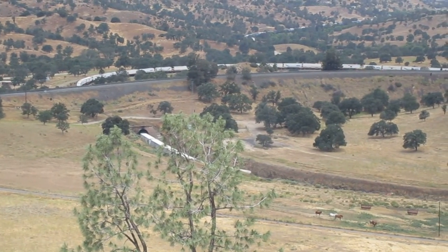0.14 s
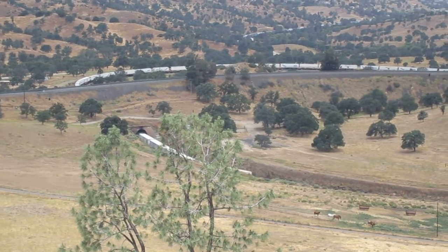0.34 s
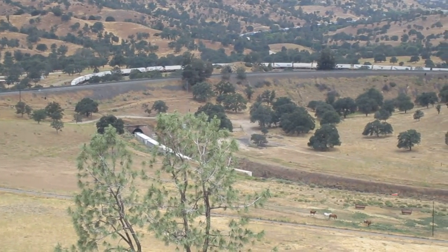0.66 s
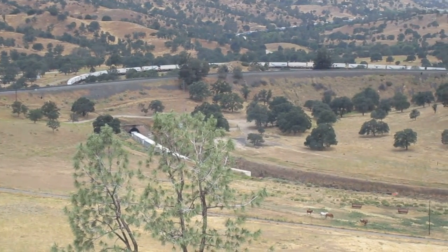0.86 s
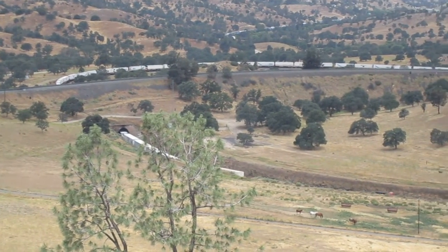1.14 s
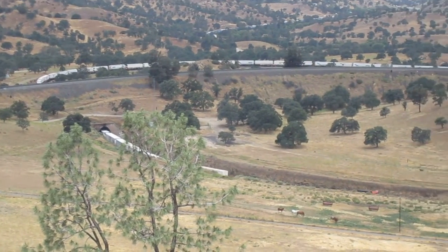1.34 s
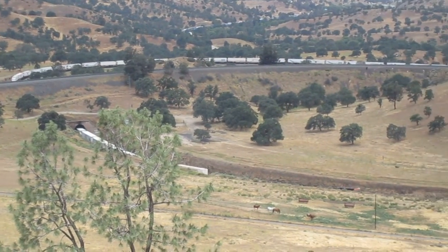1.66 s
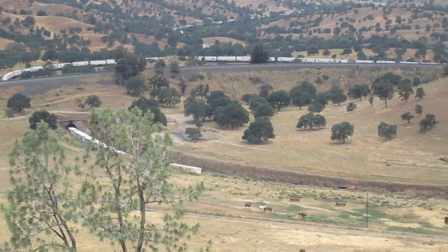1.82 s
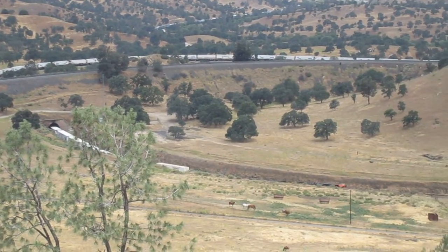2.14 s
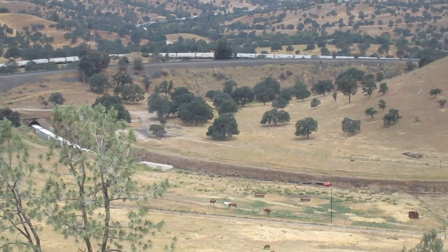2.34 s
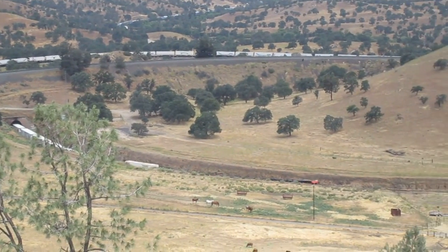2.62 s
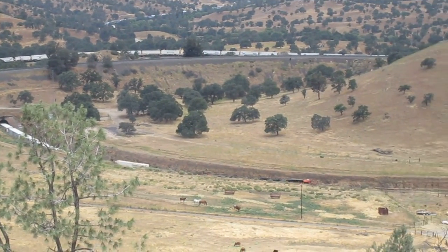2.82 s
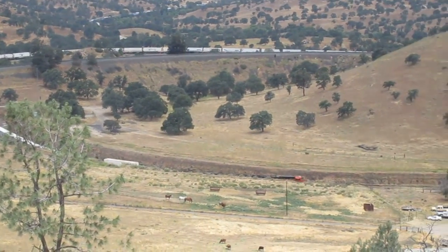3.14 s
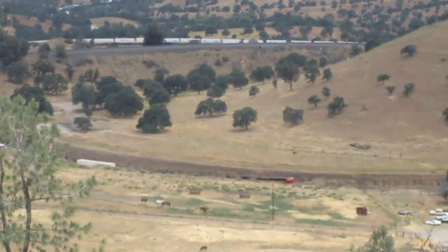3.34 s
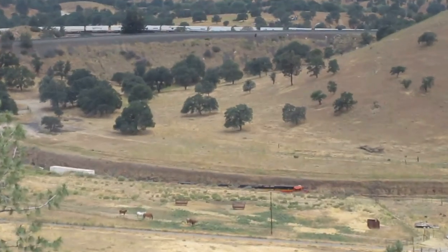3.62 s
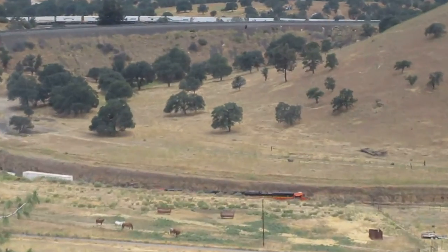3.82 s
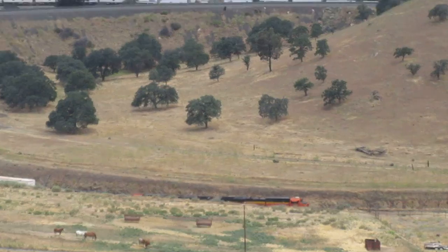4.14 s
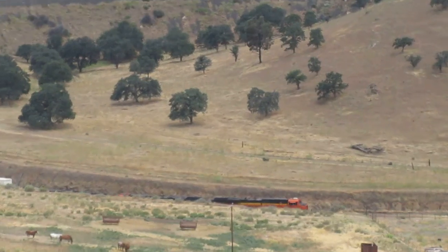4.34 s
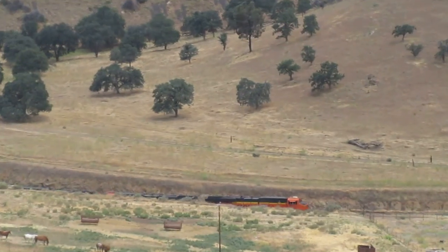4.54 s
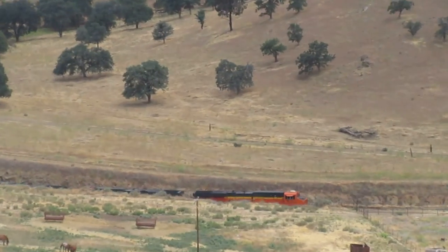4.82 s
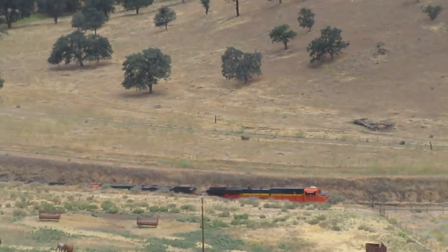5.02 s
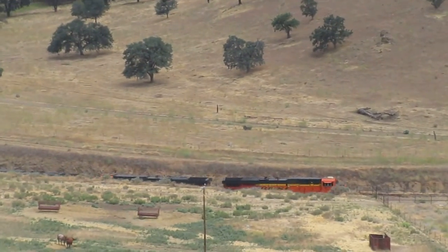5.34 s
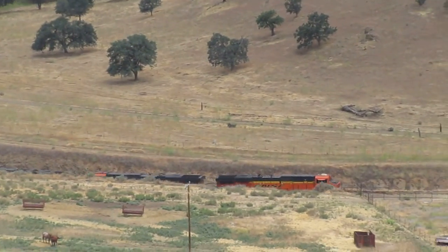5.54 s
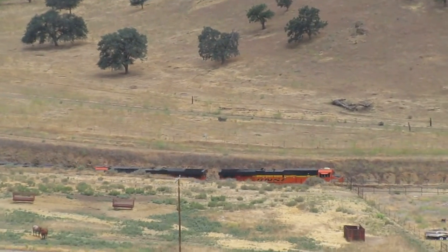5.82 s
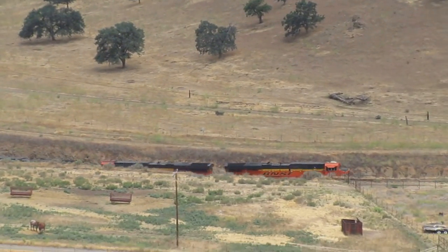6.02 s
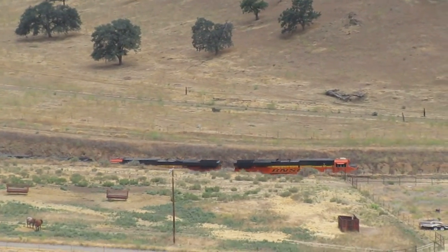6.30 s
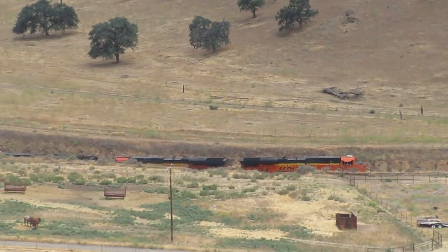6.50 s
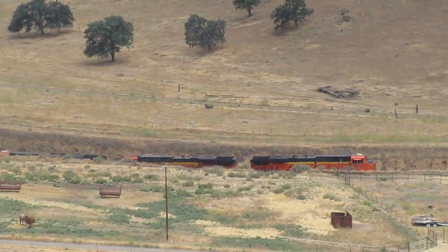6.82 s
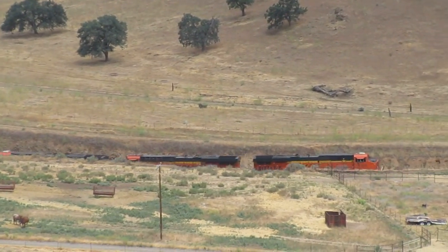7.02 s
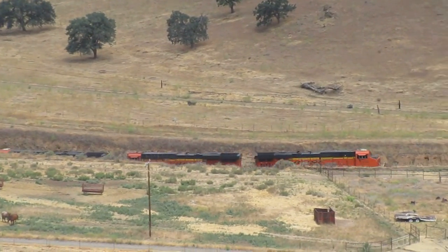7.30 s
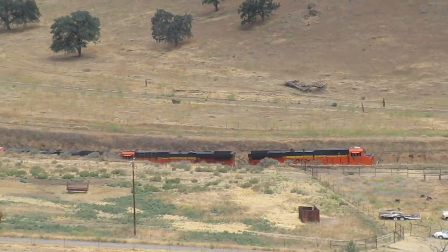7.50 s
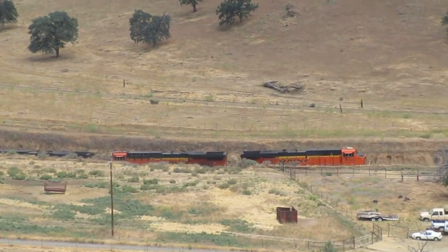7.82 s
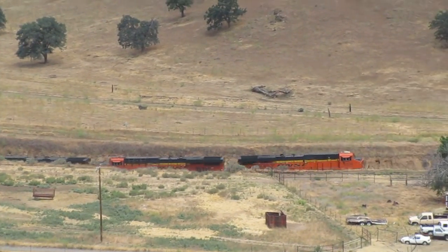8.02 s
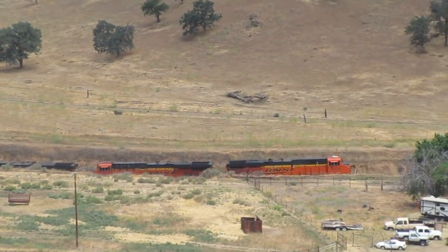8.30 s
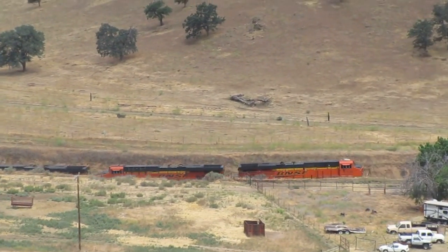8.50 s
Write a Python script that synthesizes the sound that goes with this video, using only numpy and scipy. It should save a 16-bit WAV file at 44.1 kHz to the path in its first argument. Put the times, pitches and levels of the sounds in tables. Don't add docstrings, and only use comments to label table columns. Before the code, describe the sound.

Outdoors on a dry hillside, a small camera's unprotected microphone is battered by gusts: low thuds, flutters and occasional clipped bursts. Behind them, distant diesel locomotives drone steadily with faint whines and a soft rolling roar of wheels. Around three seconds the lens drive clicks and whirrs faintly for about two seconds. The heaviest wind blows come near five and six seconds, then it calms and the train is clearer.

```python
import sys
import numpy as np
from scipy import signal
from scipy.fft import rfft, irfft
from scipy.io import wavfile
from scipy.ndimage import uniform_filter1d, minimum_filter1d

SR = 44100
rng = np.random.default_rng(int(sys.argv[2]) if len(sys.argv) > 2 else 0)


def gain_from_decibels(decibels):
    exponent = np.asarray(decibels, float) / 20
    return 10 ** exponent


def to_wav(s):
    ch = np.atleast_2d(s).T
    pcm = np.round(np.clip(ch, -1, 1) * 32767)
    wavfile.write(sys.argv[1], SR, pcm.astype(np.int16))


N = 381899
TIME = np.arange(N) / SR
CYCLE_HZ = 8.84
SCAN_HZ = 15734
# time_s, level_db, treble_db
ROAR = [(0, -38, -5), (.5, -41, -3.5), (.8, -43, -3.5), (1.35, -42, -6), (1.7, -39.5, -7),
        (2.27, -39, -7.5), (2.45, -36.5, -3), (2.65, -36, -2), (2.86, -35, -6), (3.15, -38, -3),
        (3.52, -41, -1.5), (3.88, -40, -7), (4.6, -42, -5.5), (5.05, -42, -5), (5.37, -36, -3),
        (5.7, -39, -6), (6.1, -40, -6.5), (8.66, -39.5, -5.5)]


def unit(x):
    return x / np.sqrt(np.mean(x ** 2))


def columns(table):
    time_s, *rest = np.transpose(table)
    return [np.interp(TIME, time_s, column) for column in rest]


def swells(rows, base_db):
    coarse = TIME[::64]
    size = gain_from_decibels(base_db)
    for peak_s, length_s, peak_db in rows:
        phase = np.clip((coarse - peak_s) / length_s, -.5, .5)
        size = size + gain_from_decibels(peak_db) * np.cos(np.pi * phase) ** 2
    return np.interp(TIME, coarse, 20 * np.log10(size))


def walk(rate_hz):
    hold = int(SR / rate_hz)
    levels = np.repeat(rng.standard_normal(N // hold + 1), hold)
    return 1.292 * uniform_filter1d(uniform_filter1d(levels, hold), hold)[:N]


def band(x, lo_hz, hi_hz, order=2):
    return signal.sosfilt(signal.butter(order, [lo_hz, hi_hz], "band", fs=SR, output="sos"), x)


def coloured(colour, lo_hz, hi_hz):
    hz = np.maximum(np.arange(N // 2 + 1) * SR / N, 1)
    point_hz, point_db = np.transpose(colour)
    shape = gain_from_decibels(np.interp(np.log(hz), np.log(point_hz), point_db))
    inside = (hz > lo_hz) & (hz < hi_hz)
    shape = shape / np.sqrt(2 * np.sum(shape[inside] ** 2) / N)
    return irfft(rfft(rng.standard_normal(N)) * shape, N)


def tones(hz, orders, flutter_db, flutter_hz):
    turn = 2 * np.pi * np.cumsum(hz) / SR
    out = 0
    for multiple, db in orders:
        level = np.sqrt(2) * gain_from_decibels(db + flutter_db * walk(flutter_hz))
        out = out + level * np.sin(multiple * turn + 7 * rng.random())
    return out


def exhaust():
    # peak_s, length_s, peak_db
    order_swells = [
        [(1.75, 1.3, -23), (2.8, 1.1, -26), (3.9, 1.3, -26), (8.5, 1.7, -22)],
        [(.3, 1.9, -18), (1.25, 1.5, -21), (3.5, 1.1, -25), (4.3, 1.1, -29), (5.6, 1.3, -24)],
        [(.95, .8, -23), (2.3, 1.2, -28), (2.9, .8, -25), (3.8, 1.2, -29), (6.4, 1.6, -27), (8.55, 1.1, -23)],
        [(.5, .7, -25), (1.6, 1.3, -23), (3.0, .7, -20), (4.15, 1.6, -23), (6.7, 1.7, -24), (8.5, 1.2, -26)],
    ]
    # multiple of the cycle, level_db
    weak_orders = [(10, -36), (11, -35), (14, -40), (18, -43.5), (19, -38), (21, -39.5)]
    cycle = np.full(N, CYCLE_HZ)
    levels_db = map(swells, order_swells, (-36, -34, -36, -34))
    strong = tones(cycle, zip((6, 9, 12, 15), levels_db), flutter_db=2.0, flutter_hz=4.3)
    weak = tones(cycle, weak_orders, flutter_db=3.5, flutter_hz=3.4)
    return strong + gain_from_decibels(columns(ROAR)[0] + 41) * weak


def whine(level_db, hz, wander, orders):
    speed = hz * (1 + wander * walk(6))
    return gain_from_decibels(level_db) * tones(speed, orders, flutter_db=3.0, flutter_hz=7)


def gear_whine():
    # peak_s, length_s, peak_db
    gear_swells = [(1.95, .9, -43), (2.8, 1.3, -37), (4.05, 1.7, -39), (5.4, 1.5, -41), (7.25, 1.1, -40),
                   (8.2, 1.2, -44)]
    # multiple, level_db
    gear_orders = [(1, -10), (2, 1.5), (3, -11), (4, -8.5), (5, -14.5), (6, -19), (8, -16)]
    return whine(swells(gear_swells, -50), 375.3, .0015, gear_orders)


def fan_whine():
    # peak_s, length_s, peak_db
    fan_swells = [(.4, 1.3, -44), (1.9, 1.1, -44), (4.4, 1.3, -43), (7.7, 1.1, -44), (8.6, 1.5, -38)]
    # multiple, level_db
    fan_orders = [(2, -5), (3, 2), (4, 2), (5, -7), (6, -6), (7, -6), (8, -11), (10, -10.5), (11, -19)]
    return whine(swells(fan_swells, -50), 210.6, .003, fan_orders)


def motor_whine():
    # peak_s, length_s, peak_db
    motor_swells = [(1.5, 1.2, -57), (5.2, 1.5, -56), (7.5, 1.7, -43), (8.5, 1.2, -48)]
    # multiple, level_db
    motor_orders = [(1, -0.5), (2, 4.5), (3, 1), (4, -0.5), (5, -7.5), (6, -10.5)]
    return whine(swells(motor_swells, -61), 418.5, .0005, motor_orders)


def turbocharger():
    # peak_s, length_s, peak_db
    turbo_swells = [(.15, .3, -12), (.62, .25, -6), (.95, .7, -8), (3.3, 1.1, -12), (4.6, .9, -14),
                    (6.9, 2.3, -10), (8.3, 1.5, -12)]
    centre_hz, width_hz = 3848, 260
    rush = band(rng.standard_normal(N), centre_hz - width_hz / 2, centre_hz + width_hz / 2)
    return gain_from_decibels(swells(turbo_swells, -17) + 2.5 + 2 * walk(15)) * unit(rush)


def gear_housing(treble_db):
    ring = unit(band(rng.standard_normal(N), 2930, 3060))
    return gain_from_decibels(1.5 * treble_db - 9 + 2 * walk(12)) * ring


def roar():
    # pitch_hz, level_db (per Hz)
    roar_colour = [(50, -55), (110, -52.5), (240, -62), (500, -73.5), (850, -67.5), (960, -68),
                   (1100, -78.5), (1400, -73.5), (1800, -80.5), (2800, -83.5), (4200, -92), (5400, -101),
                   (6100, -111), (7200, -126)]
    level_db, treble_db = columns(ROAR)
    bass_db = 0.6 * (-40 - level_db) + 0.3
    noise = coloured(roar_colour, 1669, 2330)
    edges_hz = 50 * 2 ** np.arange(0, 7.6, .5)
    out = 0
    for lo_hz, hi_hz in zip(edges_hz, edges_hz[1:]):
        tilt_db = bass_db if hi_hz < 1200 else (treble_db + 5) * (lo_hz > 2200)
        flutter_db = 0.73 * walk(3.7) + 1.06 * walk(20)
        out = out + gain_from_decibels(tilt_db + flutter_db) * band(noise, lo_hz, hi_hz, order=3)
    throb = 1 + 0.085 * np.sin(2 * np.pi * 3 * CYCLE_HZ * TIME)
    return gain_from_decibels(level_db - 2.0) * throb * (out + gear_housing(treble_db) + turbocharger())


def eddy(hz, turns, lean=1):
    half = int(SR * turns / hz)
    t = np.arange(-half, half) / SR
    return np.hanning(len(t)) * np.cos(2 * np.pi * hz * t + lean)


def wind():
    # time_s, level_db
    gust = [(0, -15), (.14, -22), (.62, -18), (.76, -22), (1.45, -26), (1.63, -23), (2.4, -28), (3.05, -23),
            (3.3, -30), (3.75, -32), (4.2, -24), (5.1, -26), (5.47, -18), (5.87, -21), (6.0, -28),
            (7.0, -33), (7.15, -24), (8.66, -24)]
    # peak_s, peak_db
    heaves = [(.3, -27), (.55, -29), (1.0, -29), (1.21, -22), (1.57, -20), (1.7, -21), (1.98, -20),
              (2.17, -17), (2.3, -22), (2.46, -13), (2.62, -15), (3.02, -17), (3.23, -17), (3.4, -12),
              (3.5, -13), (3.74, -26), (3.96, -13), (4.29, -20), (4.7, -22), (5.33, -20), (5.47, -16),
              (5.86, -16), (6.08, -20), (6.44, -20), (6.7, -12), (7.28, -23), (7.62, -23), (8.05, -27),
              (8.32, -24), (8.55, -27)]
    # pitch_hz, level_db
    eddies = [(35, 2.5), (60, -3.5), (100, 1.5), (170, 1.5), (280, -3.5), (450, -8.5), (720, -18.5),
              (1100, -30)]
    gust_db, = columns(gust)
    heave_length_s = .28
    heave_db = swells([(s, heave_length_s, db) for s, db in heaves], -36)
    puff = np.minimum(walk(25), 1.1)
    out = 0
    for k, (hz, db) in enumerate(eddies):
        hits = np.zeros(N)
        at = rng.integers(N, size=int(1.3 * hz * N / SR))
        hits[at] = rng.standard_normal(len(at)) * gain_from_decibels(2.0 * rng.exponential(size=len(at)))
        share = min(hz / 150, 1)
        puffed_db = gust_db + (1.0 + 0.58 * k) * puff
        gain = gain_from_decibels(db + (1 - share) * heave_db + share * puffed_db)
        out = out + gain * unit(signal.oaconvolve(hits, eddy(hz, turns=0.69), "same"))
    return out * gain_from_decibels(-3.5)


def add_swing(out, centre_s, db, swing):
    at = max(int(centre_s * SR) - len(swing) // 2, 0)
    out[at:at + len(swing)] += gain_from_decibels(db) * swing


def buffets():
    # peak_s, peak_db, pitch_hz, sharp_db
    hard_buffets = [(.04, -6, 278, -20), (.278, -12, 284, -9), (.408, -11.5, 140, -12.5),
                    (.42, -4.1, 312, -23), (.498, -8.5, 215, -13), (.65, -6.5, 215, -15),
                    (.899, -10.5, 240, -13), (1.218, -6.7, 215, -24), (1.792, -9.5, 287, -15),
                    (1.853, -5, 244, -25), (1.956, -6, 248, -13.5), (2.133, -11, 312, -10),
                    (2.142, -6, 168, -19), (2.961, -7, 140, -19), (2.993, -8.5, 192, -16),
                    (3.063, -15.5, 549, -18), (3.079, -4.5, 220, -22), (3.167, -9.9, 248, -16),
                    (3.427, -8.5, 377, -35), (4.334, -5.5, 215, -16), (4.744, -4.5, 188, -18),
                    (4.952, -6.5, 142, -10), (4.97, -5, 272, -16), (4.985, .5, 194, -13),
                    (5.544, -9.1, 316, -14), (5.563, -7, 161, -22), (5.879, -.5, 584, -20),
                    (5.892, -4, 300, -12), (7.072, -8, 146, -13), (7.39, -10, 523, -20)]
    # peak_s, peak_db, pitch_hz
    knocks = [(.06, -13.5, 510), (.305, -9, 291), (.397, -9, 260), (.673, -11, 388), (.856, -12, 141),
              (.911, -9.5, 280), (.999, -11.6, 301), (1.51, -9, 200), (1.556, -11, 140), (1.592, -10, 183),
              (1.843, -8, 288), (1.918, -7.2, 291), (1.968, -11, 265), (2.59, -10, 237), (2.681, -8.5, 161),
              (2.972, -10.6, 406), (3.027, -9, 194), (3.401, -9, 306), (3.918, -12.5, 248),
              (4.252, -10.5, 161), (4.578, -10.5, 312), (5.237, -12, 390), (5.441, -6.5, 187),
              (5.633, -11.5, 140), (5.755, -11, 196), (5.827, -10, 140), (5.844, -7.5, 254),
              (7.243, -11, 181), (7.316, -7.5, 212), (7.369, -10, 203)]
    # peak_s, peak_db, pitch_hz
    crests = [(4.984, -24, 1600), (5.875, -4, 330), (5.881, -8, 560), (5.881, -22, 1900), (5.884, -14, 800),
              (5.893, -24, 1750), (7.072, -13, 620), (3.165, -15, 650)]
    knock_sharp_db = -22
    rows = list(hard_buffets) + [(*knock, knock_sharp_db) for knock in knocks]
    out = np.zeros(N + SR)
    for s, db, hz, sharp_db in rows:
        # pitch_hz, level_db, turns, spread_s
        parts = ((hz, 0, 1.1, .001),
                 (np.sqrt(hz * 1100), sharp_db * .45, 1.5, .003),
                 (1050, sharp_db - 1.0, 1.4, .0015),
                 (hz * .5, -3, .9, .012))
        for part_hz, part_db, turns, spread_s in parts:
            swing = eddy(part_hz, turns, lean=2 * np.pi * rng.random())
            late_s = spread_s * (rng.random() - .5)
            add_swing(out, s + late_s, db + part_db + 0.5, swing)
    for s, db, hz in crests:
        add_swing(out, s, db, eddy(hz, turns=1.6))
    return out[:N]


def lens_whirr():
    # pitch_hz, level_db (per Hz)
    drive_colour = [(4500, -25), (6500, -0.5), (7500, 2.5), (9000, -2.5), (10800, -1), (13200, -8),
                    (15000, -5.5), (15800, -8)]
    # start_s, end_s, level_db
    drive_runs = [
        (3.0, 3.2, -66),
        (3.2, 3.78, -70),
        (3.78, 4.75, -66.5),
        (4.75, 5.1, -70),
    ]
    grain = gain_from_decibels(1.5 * walk(30) + 1.5 * walk(200))
    whirr = coloured(drive_colour, 6500, 15000) * grain
    running = sum(gain_from_decibels(db) * ((TIME > start) & (TIME <= end)) for start, end, db in drive_runs)
    return uniform_filter1d(running, size=1300) * whirr


def lens_ticks():
    # start_s, level_db, top_db (upper band over
    ticks = [(3.010, -60.5, -4), (3.022, -58, -12), (3.0375, -46, 1), (3.066, -60.5, -0.5),
             (3.082, -52.5, -5.5), (3.130, -61, -1), (3.180, -50, -2.5), (3.252, -64.5, 1),
             (4.744, -60, -1), (5.026, -64.5, 1), (4.9835, -54, 0), (5.8775, -60, -3)]
    out = np.zeros(N)
    t = np.arange(int(.01 * SR)) / SR
    for s, db, top_db in ticks:
        snap = rng.standard_normal(len(t)) * np.exp(-t / 0.0013)
        top = unit(band(snap, 8600, 13500, order=3))
        tick = unit(band(snap, 5400, 7300)) + gain_from_decibels(top_db) * top
        at = int(s * SR)
        out[at:at + len(t)] += gain_from_decibels(db - 5) * tick
    return out


def electronics():
    # pitch_hz, level_db (per Hz)
    hiss_colour = [(4000, -27.5), (6000, -1.5), (7500, -5), (10000, -6.5), (12500, -10.5), (15000, -13),
                   (15800, -14.5)]
    scan = gain_from_decibels(-18) * np.sin(2 * np.pi * SCAN_HZ * TIME)
    return gain_from_decibels(-70) * (coloured(hiss_colour, 6500, 15000) + scan)


def gain_db():
    # start_s, drop_db
    ducks = [(.65, 3.5), (1.96, 2), (2.14, 2.5), (3.08, 2), (3.43, 1.1), (3.96, 1.2), (4.34, 1.1),
             (4.75, 3.5), (4.99, 4.5), (5.55, .6), (5.885, 5.2)]
    start_db, climb_db_per_s = -4.5, 3.7
    free = start_db + climb_db_per_s * TIME - sum(drop * (TIME > s) for s, drop in ducks)
    excess = np.maximum.accumulate(np.maximum(free, 0))
    return uniform_filter1d(free - excess, 400)


def scene():
    train = exhaust() + gear_whine() + fan_whine() + motor_whine() + roar()
    steady = train + wind() + lens_whirr() + electronics()
    return (gain_from_decibels(gain_db()) * steady + buffets() + lens_ticks())[None]


def low_pass(x):
    return signal.sosfilt(signal.butter(12, 15745, fs=SR, output="sos"), x)


def record(dry):
    ceiling = 1.03
    room = minimum_filter1d(ceiling / np.maximum(np.abs(dry), ceiling), 160)
    limited = dry * uniform_filter1d(uniform_filter1d(room, 80), 80)
    trapped = signal.lfilter(*signal.iirnotch(SCAN_HZ / 2, 45, SR), limited)
    mix = np.clip(trapped, -1, 1)
    return low_pass(mix)


dry = scene()
out = record(dry)
to_wav(out)
```